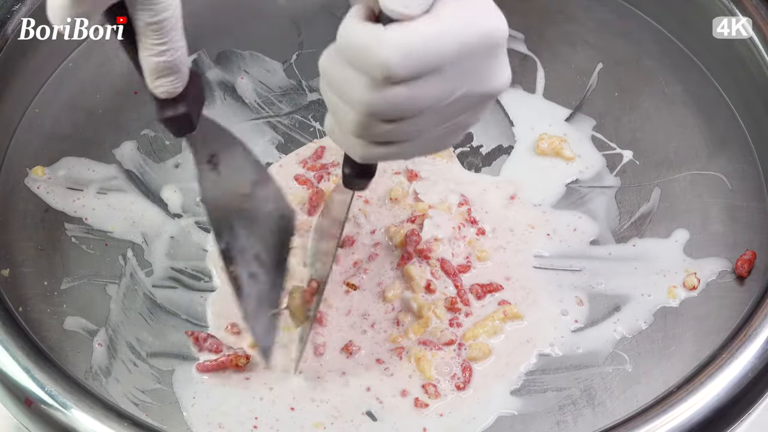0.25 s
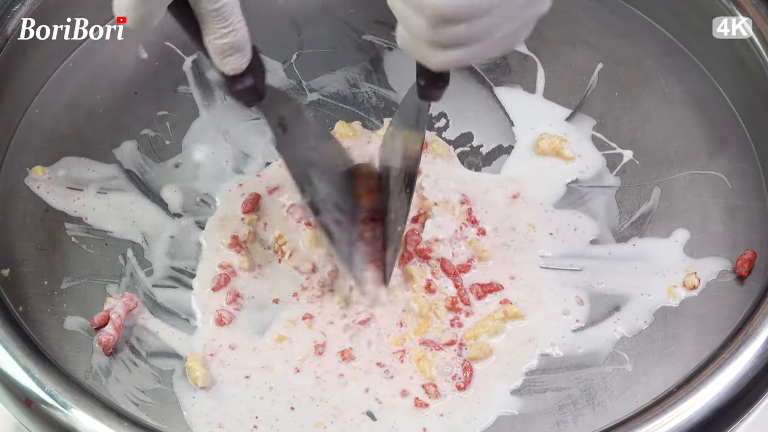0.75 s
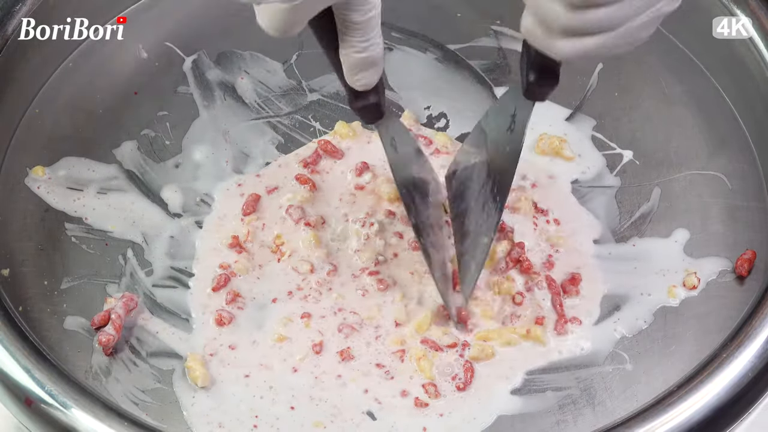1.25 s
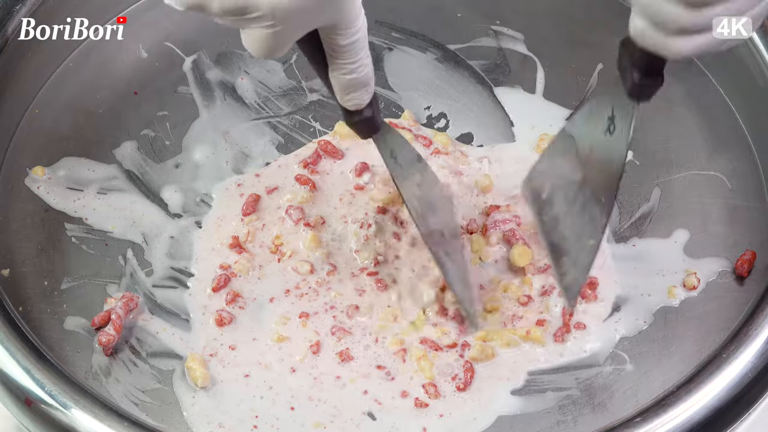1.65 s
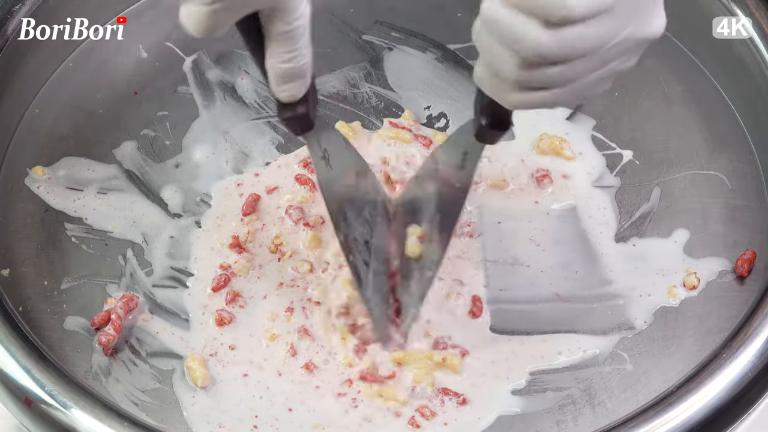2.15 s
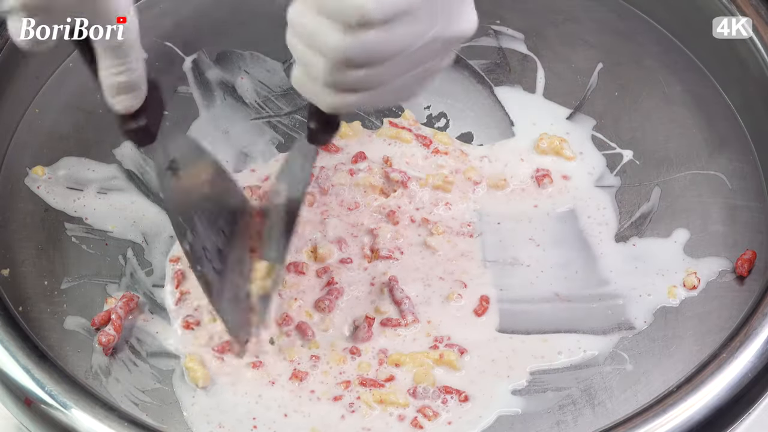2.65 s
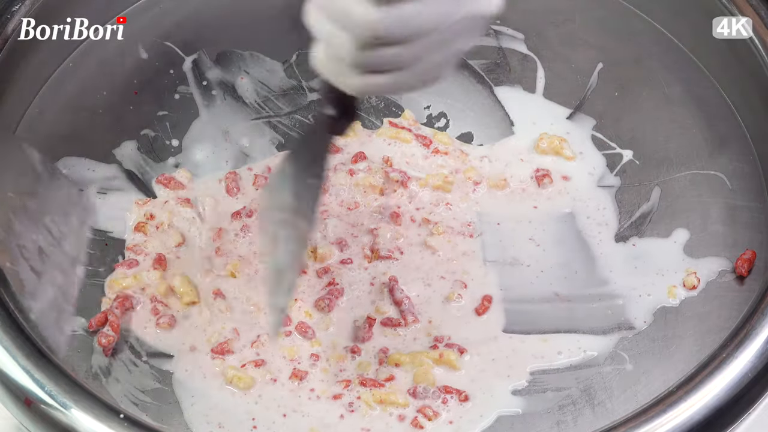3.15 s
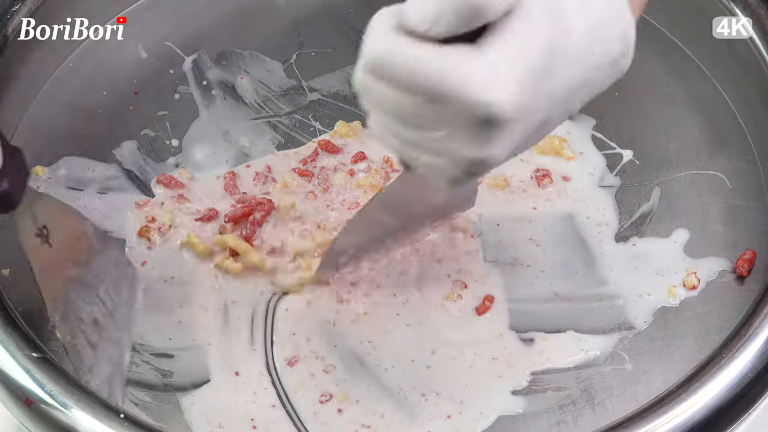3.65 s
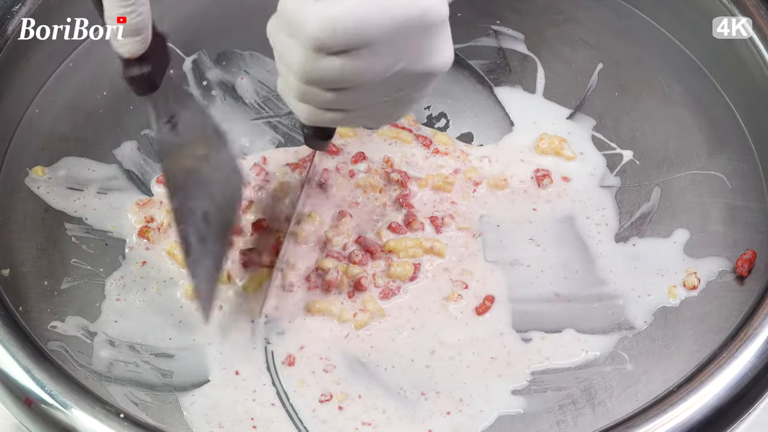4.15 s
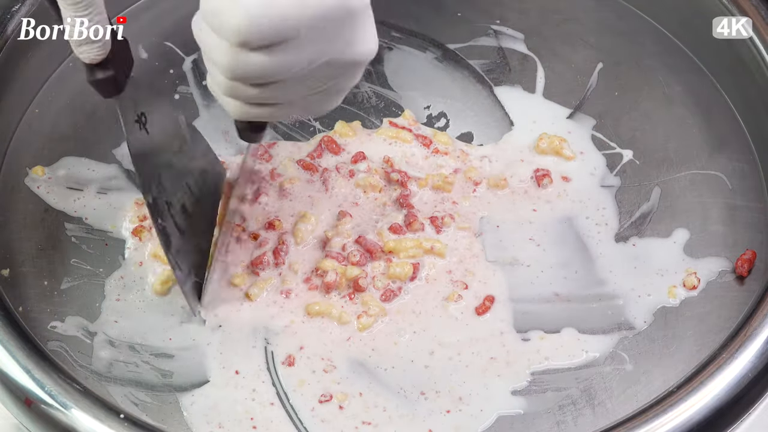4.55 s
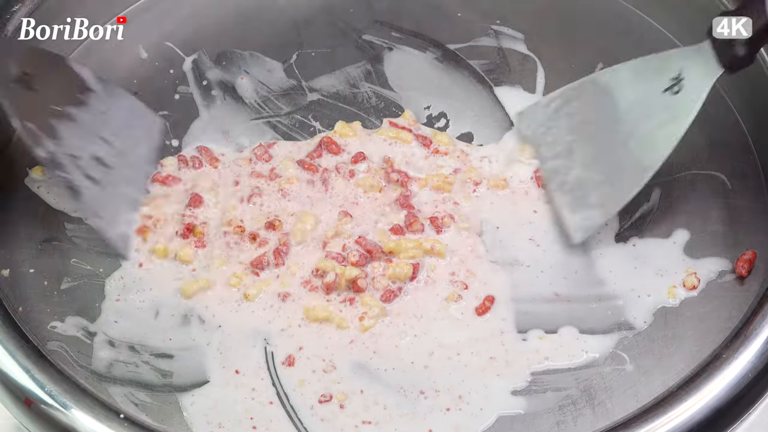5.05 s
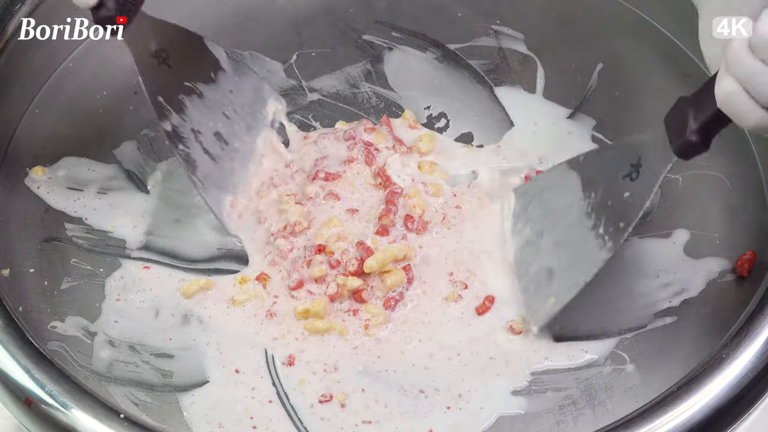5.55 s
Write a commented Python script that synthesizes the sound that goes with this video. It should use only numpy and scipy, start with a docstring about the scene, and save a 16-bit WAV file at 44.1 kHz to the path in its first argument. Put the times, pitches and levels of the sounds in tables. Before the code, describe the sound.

Close up in a small room, metal spatulas clatter rapidly against a cold steel pan, the blades ringing and the pan thudding under each hit. The chopping softens, picks up again, breaks for a few scrapes over frozen cream, then returns in one more quick burst. It ends with sparse clicks and slightly squeaky scrapes. A cooler hums quietly and steadily throughout.

```python
"""Quick, sharp clacks and scrapes: two steel spatulas chop fruit into cream on a chilled steel pan.
Each blow cracks, sets the blades ringing and thumps the pan, which sounds brighter near its rim.
Between blows the edges rasp over the frozen film. Short pitched bursts add squeals and a few knocks.
It all sounds close by, in a small room, with the cooler's compressor and fan humming underneath."""
import sys
import numpy as np
from scipy import signal
from scipy.fft import rfft, irfft, next_fast_len
from scipy.io import wavfile
from scipy.ndimage import map_coordinates

SR = 44100
rng = np.random.default_rng(int(sys.argv[2]) if len(sys.argv) > 2 else 0)


def wav_out(sig):
    """Save sig, one row per channel (or a flat mono array), as 16-bit PCM at SR to the path in sys.argv[1]."""
    wavfile.write(sys.argv[1], SR, np.round(np.clip(np.atleast_2d(sig).T, -1, 1) * 32767).astype(np.int16))


N = 256206

# A mode is one tone that an object rings at; ring_s (or t60) is the time to fade by 60 dB.
# Levels in the tables are relative: the functions add their own gains.
# A blade's edge hits the pan: time_s, strength_db, thump_db, slide_before_s
BLOWS = [(.004,-15.5,-29,0.015), (0.0866,-15.5,-29.5,.014), (0.131,-15.5,-29,0), (.2043,-15.5,-30,0.0052),
         (0.2587,-14,-24,0.017), (0.3586,-17,-36,0.011), (0.4029,-17.5,-32,.014), (0.4768,-13.5,-32,0),
         (.539,-17.5,-32.5,0.0046), (0.6076,-19,-34,0.001), (.669,-33,-23,0.015),
         (0.7419,-17.5,-32.5,0.003), (.824,-35,-52,0.02), (0.875,-37,-63,0), (.966,-29,-64,0),
         (0.9994,-36,-54,0), (1.0766,-24,-47,0.0079), (1.15,-30,-50,0.0002), (1.208,-20,-25,0.0087),
         (1.2941,-17,-30,0.012), (1.341,-25,-35.5,0.00046), (1.424,-27.5,-40,0.0027), (1.529,-24.5,-59,0),
         (1.5609,-27,-47,0.002), (1.5728,-27,-41,0.00029), (1.635,-35.5,-67,0), (1.7102,-16,-27,0.0022),
         (1.8664,-15,-35,0.0061), (1.9396,-24,-59,0.00061), (1.971,-31.5,-53,0.0011),
         (2.093,-14,-31.5,0.016), (2.1043,-18.5,-40,0), (2.1687,-17,-29.5,0), (2.2849,-18.5,-50,0.017),
         (2.344,-18,-28.5,0.013), (2.4,-14,-24,0), (2.478,-15.5,-28,0.024), (2.5321,-15.5,-26.5,0.014),
         (2.605,-15.5,-29.5,0.0093), (2.625,-16.5,-42,0.00039), (2.6677,-16.5,-22,0),
         (2.736,-15.5,-31.5,0.013), (2.8067,-13,-27.5,0.0042), (2.8744,-15.5,-31.5,0.017),
         (2.8955,-17,-36,0.00084), (2.939,-13,-30,0), (2.9507,-16.5,-31.5,0), (3.0076,-15.5,-38.5,0),
         (3.0246,-15,-43,0.0073), (3.0604,-15,-30.5,0.00016), (3.2095,-19.5,-48,0),
         (3.2281,-14.5,-34.5,0.0029), (3.3378,-18.5,-49,0.0057), (3.3504,-16.5,-52,0.00042),
         (3.668,-17.5,-48,0.004), (3.72,-24,-42.5,0.0031), (3.917,-19.5,-40.5,0.021),
         (3.9542,-20,-39.5,0.00075), (3.9894,-12.5,-24,0.0012), (4.016,-19.5,-29.5,0),
         (4.109,-16.5,-29,0.018), (4.176,-14.5,-27,0.0011), (4.258,-17,-33.5,0.015),
         (4.335,-14,-29.5,0.012), (4.393,-14.5,-29,0.016), (4.4775,-13,-24.5,0.021),
         (4.5522,-14.5,-31.5,0.0082), (4.619,-14.5,-30,0.0032), (4.682,-14.5,-34.5,0.003),
         (4.7542,-12,-29,0.016), (4.855,-23,-48,0.025), (5.0331,-18.5,-45,0), (5.0868,-17.5,-44,0.0011),
         (5.4361,-14.5,-47,0.0041), (5.468,-21,-45.5,0), (5.687,-46,-74,0), (5.8065,-16.5,-56,0.0015)]
# Where the blades work, from 0 (middle of the pan) to 1 (rim): time_s, distance
BLADE_PATH = [(0, 0.7), (.48, 0.46), (.7, 0.18), (1.2, 0.059), (2.15, .15), (3.05, 0.81), (3.4, 0.37),
              (4.0, 0.81), (4.7, 0.93), (5.5, 0.46)]
# The strongest modes of the blades: pitch_hz, level_db, ring_s
BLADE_MODES = [(1350, -7, 0.14), (1474, -12.5, 0.23), (1770, -16, 0.2), (1940, -4.5, 0.11),
               (1988, -2.5, 0.2), (2067, -6.5, 0.12), (2480, -9, 0.15), (2360, -7, 0.12), (2615, 1.5, 0.14),
               (3083, -5, 0.23), (3310, -2.5, 0.21), (3240, -6.5, 0.23), (3460, -10, 0.19),
               (3500, -15, 0.1), (3960, -8, 0.12), (4200, 0, 0.064), (4930, -3.5, 0.14), (5380, -2, 0.13),
               (5570, -12, 0.2), (6300, -16, 0.082), (7550, -6.5, 0.15), (8160, -8, 0.18), (9850, -4, .16),
               (10650, -11, 0.13), (12150, -8.5, 0.23), (13300, -7, .18)]
# The crowd of weaker steel modes: pitch_hz, level_db
STEEL_WASH = [(150, -29), (420, -2.5), (700, -7.5), (870, -6.5), (1150, -3.5), (1420, 6), (1620, -6.5),
              (1950, 9.5), (2600, 2.5), (2830, -10.5), (3200, 3.5), (5500, 1.5), (6500, -5.5),
              (16000, -28.5)]
# Treble resonances of the blades: pitch_hz, width_hz, level_db
TREBLE_PEAKS = [(7500, 550, 5.5), (8040, 60, -1), (9600, 280, 1), (10770, 410, 13), (12600, 250, -8),
                (13600, 350, 2)]
# The contact noise of a blow: pitch_hz, level_db
CRACK_SPECTRUM = [(50, -21.5), (150, -19), (400, -8), (900, -20.5), (2000, -2), (2850, -4), (3500, 3.5),
                  (5300, 1), (6500, -5), (10000, -1), (16000, -1)]
# The pan's low modes, damped by the cream: pitch_hz, level_db, ring_s
PAN_MODES = [(126.5, -18.5, 0.22), (160.7, -14, 0.15), (261.5, -14.5, 0.22), (287.8, -0.5, 0.11),
             (314.5, 4.5, 0.12), (339, -10.5, 0.14), (365.2, -10.5, 0.22), (421, -15.5, 0.14),
             (515.4, -10, 0.15), (558, -5, 0.12), (582.5, -4.5, 0.18), (622, -15, 0.26), (680, -17, 0.23),
             (728, -27.5, 0.16), (959, -21, 0.13), (1061, -17.5, 0.12)]
# The pan's many weak modes: pitch_hz, level_db
PAN_WASH = [(80, -25.5), (200, -17), (320, 1.5), (460, 0.5), (600, 7), (720, -9.5), (850, -15), (1100, -4),
            (1600, -16), (4000, -65)]
# Separate pushes of an edge over the pan: start_s, length_s, level_db
STROKES = [(0.488,0.029,-32.5), (0.926,0.016,-38), (1.072,0.015,-36.5), (1.149,0.0094,-34),
           (1.453,0.011,-39.5), (1.696,.013,-44), (1.875,0.032,-27.5), (2.13,0.13,-37.5),
           (2.329,.017,-29.5), (2.896,0.031,-34), (2.955,0.14,-29), (3.467,0.027,-38), (4.319,.016,-27.5),
           (5.031,0.014,-24.5), (5.128,0.012,-36), (5.168,0.023,-38.5), (5.433,0.074,-33.5),
           (5.515,0.03,-33), (5.565,0.045,-51), (5.759,.048,-55)]
# The noise of a sliding edge: pitch_hz, level_db
SCRAPE_SPECTRUM = [(100, -25.5), (320, 0.5), (600, -23.5), (900, -8), (1500, -6.5), (2100, -5.5),
                   (2850, -3), (3400, 2), (5000, 3.5), (6500, -4.5), (10000, -5), (16000, -9)]
# Short pitched bursts: edge squeals, plus a dull thud, a low rim knock and a thin steel ring:
# start_s, length_s, pitch_hz, width_hz, level_db
PITCHED_BURSTS = [(0.667,0.026,1870,1990,-32), (1.872,0.045,680.3,169,-37), (2.099,.003,4153,700,-20.5),
                  (2.275,0.012,2522,600,-34.5), (2.401,0.027,3460,300,-29.5), (3.033,0.053,4900,700,-29),
                  (3.225,0.011,3792,790,-29.5), (3.413,.053,4380,550,-46), (3.47,0.017,4220,600,-38.5),
                  (3.674,0.017,2538,790,-31.5), (3.716,.014,5356,70,-35.5), (5.029,0.0047,4410,500,-23.5),
                  (5.437,0.0095,5440,450,-26), (5.463,.01,1194,405,-36.5), (5.522,0.01,3690,1400,-29)]
# The tones of the compressor: pitch_hz, level_db
HUM_TONES = [(71.5, -61.5), (108, -59), (144, -53.5), (215, -61), (287, -63.5), (495, -69)]
# The rush of fan and coolant: pitch_hz, level_db
FAN_SPECTRUM = [(28, -8), (52, -16), (85, -10), (150, 0.5), (200, -10), (320, -15.5), (500, -16),
                (1000, -18.5), (2000, -24.5), (3800, -31), (5000, -28.5), (6500, -43), (16000, -53)]
# How long the room echoes: pitch_hz, ring_s
ROOM_DECAY = [(200, 0.26), (2000, 0.13), (5000, 0.15), (15000, 0.2)]

FIRM_DB, SLIDE_DB = -15.5, -30  # strength of a firm blow, and level of the slide into it
TOP_HZ = 15850  # upper edge of the sound


def blades(ring_db=-29, ring_growth=1.55, wash_db=2, mode_db=-3.5, wash_t60=0.22, attack_s=0.004):
    """Each blow rings the strong modes and a wash of weak ones that shifts with the contact point."""
    hz, db, t60 = np.transpose(BLADE_MODES)
    t = np.arange(SR // 4) / SR
    early_boost = amp(2 * np.exp(-t / 0.0021))
    shape = swell(t, attack_s) * early_boost
    bands = np.linspace(0, TOP_HZ, num=260)
    sheen = lambda f: 1 + sum(peak(f, *row) for row in TREBLE_PEAKS)
    out = np.zeros(N)
    for s, strength_db, thump_db, _ in BLOWS:
        level_db = ring_db + ring_growth * (strength_db - FIRM_DB)
        treble_db = np.clip(1.7 * (brightness(strength_db, thump_db) + 7.5), -14, 6)
        contact_db = 7 * rng.standard_normal(len(bands))
        steel = lambda f: amp(along(STEEL_WASH, f) + np.interp(f, bands, contact_db))
        wash = noise(len(t), lambda f: steel(f) * sheen(f) * shelf(f, treble_db) * cream_muffle(f, s))
        wash *= fade(t, wash_t60 * ring_stretch(s))
        gains = amp(db) * shelf(hz, treble_db / 2) * cream_muffle(hz, s)
        ring = ringing(hz, t60 * ring_stretch(s), gains, t, scatter_db=5, spread=np.pi, detune=0.00392)
        add(out, s, amp(level_db) * shape * (amp(wash_db) * wash + amp(mode_db) * ring))
    return out


def cracks(rise_s=0.00034, t60=0.015, crack_db=6, cushion=0.13, grit_db=2):
    """The edge chatters on the steel for a few milliseconds; cream cushions the weak blows."""
    t = np.arange(SR // 25) / SR
    out = np.zeros(N)
    for s, strength_db, thump_db, _ in BLOWS:
        treble_db = brightness(strength_db, thump_db) + 3
        softness = 1 + cushion * np.clip(-12.5 - strength_db, 0, 12)
        shape = swell(t, rise_s * softness ** 2) * fade(t, t60 * softness) / np.sqrt(softness)
        bounces = rng.choice([-1, 1], len(t)) * amp(grit_db * wobble(2405, len(t)))
        chatter = filtered(bounces, lambda hz: amp(along(CRACK_SPECTRUM, hz)) * shelf(hz, treble_db))
        add(out, s, amp(strength_db + crack_db) * shape * unit(chatter))
    return out


def pan_thumps(attack_s=0.011, pan_db=2, wash_db=-8, wash_t60=0.17, sag=0.048, release_s=0.018):
    """The pan's modes swell just after a blow; hit in the middle, it rings mainly the low ones."""
    hz, db, t60 = np.transpose(PAN_MODES)
    t = np.arange(SR // 4) / SR
    bent_t = t - sag * release_s * swell(t, release_s)  # the pitch sags until the blade lifts
    out = np.zeros(N)
    for s, _, thump_db, _ in BLOWS:
        lift_db = -15.5 + 26 * reach(s)  # the upper modes grow toward the rim
        pitch = hz * (1 + 0.03 * reach(s))  # the stiffer rim rings a little higher
        gains = amp(db) * shelf(hz, lift_db, corner_hz=453)
        modes = ringing(pitch, t60, gains, bent_t, scatter_db=1, spread=1.21, detune=0.017)
        wash = noise(len(t), lambda f: amp(along(PAN_WASH, f))) * fade(t, wash_t60)
        thump = modes + amp(wash_db + lift_db / 2) * wash
        add(out, s, amp(thump_db + pan_db) * swell(t, attack_s) * thump)
    return out


def scrapes(rise_s=0.0021, t60=0.13, grit_db=4, judder_db=2, mode_db=3, width_hz=45, bite_share=0.11):
    """The edge catches on frost in tiny slips, which set the blade ringing."""
    t = np.arange(SR // 4) / SR
    resonance = lambda f: 1 + amp(mode_db) * sum(peak(f, hz, width_hz, db) for hz, db, _ in BLADE_MODES)
    out = np.zeros(N)
    for start, length, db in STROKES + slides():
        treble_db = -1 - 0.7 * (db - SLIDE_DB)  # pressing harder sounds duller
        roughness_db = grit_db * wobble(1500, len(t)) + judder_db * wobble(135, len(t))
        slips = rng.standard_normal(len(t)) * amp(roughness_db)
        rasp = filtered(slips, lambda f: amp(along(SCRAPE_SPECTRUM, f)) * resonance(f) * shelf(f, treble_db))
        shape = stroke_shape(t, length, rise_s + bite_share * length, t60)
        add(out, start, amp(db) * shape * unit(rasp))
    return out


def slides(growth=0.43, run_on_s=0.0033):
    """Short skids into the blows, louder before a harder one: start_s, length_s, level_db."""
    return [(s - lead, lead + run_on_s, SLIDE_DB + growth * (db - FIRM_DB))
            for s, db, _, lead in BLOWS if lead > 0]


def pitched_bursts(rise_s=0.00047, t60=0.11, overtone_db=-14):
    """Squeals, a thud, a knock and a ring: each an uneven tone plus a faint one at triple the pitch."""
    t = np.arange(SR // 4) / SR
    out = np.zeros(N)
    for start, length, hz, width_hz, db in PITCHED_BURSTS:
        flutter = wobble(width_hz, len(t)) + 1j * wobble(width_hz, len(t))
        swing = flutter * np.exp(2j * np.pi * hz * t)
        tone = swing.real + amp(overtone_db) * abs(swing) * np.cos(3 * np.angle(swing))
        add(out, start, amp(db) * stroke_shape(t, length, rise_s, t60) * unit(tone))
    return out


def compressor(fan_db=-54, waver_db=0.7, drift_rad=0.15):
    """The compressor hums almost steadily over the rush of the cooling fan."""
    t = np.arange(N) / SR
    hum = np.zeros(N)
    for hz, db in HUM_TONES:
        level = np.sqrt(2) * amp(db + waver_db * wobble(5.4, N))
        hum += level * np.sin(2 * np.pi * (hz * t + rng.random()) + drift_rad * wobble(3.8, N))
    return hum + amp(fan_db) * noise(N, lambda hz: amp(along(FAN_SPECTRUM, hz)))


def room(x):
    """A small room's echo starts 10 ms late, each pitch dying at its own speed."""
    hz, t, spectrum = signal.stft(rng.standard_normal(SR // 2), SR, nperseg=256)
    _, tail = signal.istft(spectrum * fade(t, along(ROOM_DECAY, hz)[:, None]), SR, nperseg=256)
    tail = np.pad(tail / np.linalg.norm(tail), (SR // 100, 0))
    return signal.fftconvolve(x, tail)[:N]


def ringing(hz, t60, gains, t, scatter_db, spread, detune):
    """Fading tones, level 1 over the first 40 ms; grip and contact point vary each one at random."""
    size, phase, shift = rng.standard_normal((3, len(hz), 1))
    angle = 2 * np.pi * hz[:, None] * (1 + detune * shift) * t + spread * phase
    weights = gains[:, None] * amp(scatter_db * size)
    ring = (weights * fade(t, t60[:, None]) * np.sin(angle)).sum(axis=0)
    return ring / ring[:SR // 25].std()


def brightness(strength_db, thump_db):
    """A glancing blow moves the pan little and sounds brighter than a square one."""
    return -12.5 + 0.38 * np.clip(strength_db - thump_db, -10, 32)


def reach(s):
    """How far from the middle of the pan the blades are at s seconds, 0 to 1."""
    return np.interp(s, *np.transpose(BLADE_PATH))


def cream_muffle(hz, s, range_db=6.5, centre_hz=1450, octaves=0.47):
    """Cream in the middle of the pan muffles the steel's middle pitches."""
    band = np.exp(-(np.log2((hz + 1) / centre_hz) / octaves) ** 2)
    return amp(range_db * (reach(s) - 0.5) * band)


def ring_stretch(s, damping=0.29):
    """Ring time factor: a blade deep in the cream fades sooner than one near the rim."""
    return np.exp(damping * (reach(s) - 0.5))


def stroke_shape(t, length, rise_s, t60):
    """Loudness that rises, holds, then rings out."""
    return swell(t, rise_s) * fade(np.maximum(t - length, 0), t60)


def swell(t, rise_s):
    """Rise smoothly from 0 toward 1."""
    return 1 - np.exp(-t / rise_s)


def fade(t, t60):
    """Fall by 60 dB every t60 seconds."""
    return np.exp(-np.log(1000) * t / t60)


def shelf(hz, treble_db, corner_hz=6800):
    """Gain that turns the pitches above the corner up or down."""
    return amp(treble_db / (1 + (corner_hz / (hz + 1)) ** 4))


def peak(hz, centre_hz, width_hz, db):
    """Gain of one resonance, strongest at its centre."""
    return amp(db) / (1 + (2 * (hz - centre_hz) / width_hz) ** 2)


def amp(db):
    """Turn decibels into gain."""
    return 10 ** (np.asarray(db) / 20)


def unit(x):
    """Scale to an average (rms) level of 1."""
    return x / np.sqrt(np.mean(x ** 2) + 1e-20)


def along(points, hz):
    """Read between a table's rows on a log pitch scale."""
    pitches, values = np.transpose(points)
    return np.interp(np.log(hz + 1), np.log(pitches), values)


def filtered(x, gain):
    """Turn each pitch in x up or down by gain(hz)."""
    size = next_fast_len(len(x) + 4096)
    return irfft(rfft(x, size) * gain(np.fft.rfftfreq(size, 1 / SR)), size)[:len(x)]


def noise(n, gain):
    """Hiss shaped by gain(hz), at level 1."""
    return unit(filtered(rng.standard_normal(n), gain))


def wobble(rate, n):
    """A smooth curve through rate random points a second."""
    knots = rng.standard_normal(int(n * rate / SR) + 4)
    return map_coordinates(knots, [np.arange(n) * rate / SR], mode="nearest")


def add(track, s, sound):
    """Mix a sound into the track at s seconds."""
    part = track[max(round(s * SR), 0):][:len(sound)]
    part += sound[:len(part)]


def scene(room_db=-15):
    """Spatulas and pan in the room, over the compressor."""
    chopping = blades() + pan_thumps() + cracks() + scrapes() + pitched_bursts()
    return (chopping + amp(room_db) * room(chopping) + compressor())[None]


def record(dry):
    """Cut away the treble above TOP_HZ."""
    return filtered(dry[0], lambda hz: 1 / (1 + (hz / TOP_HZ) ** 200))[None]


dry = scene()
out = record(dry)
wav_out(out)
```